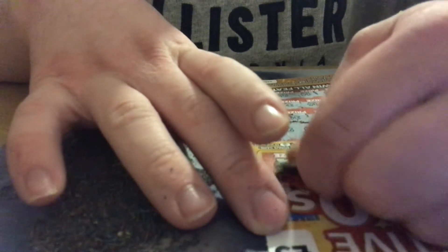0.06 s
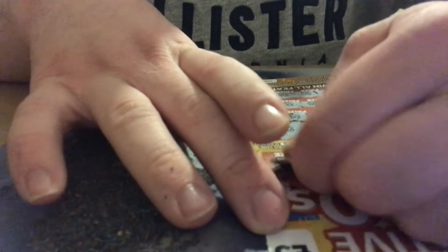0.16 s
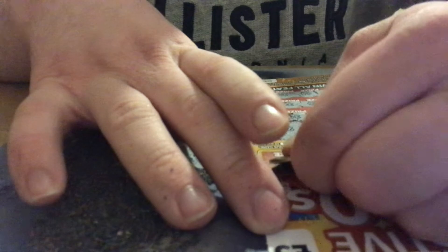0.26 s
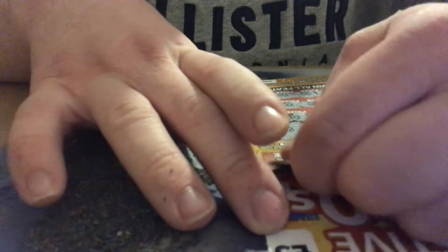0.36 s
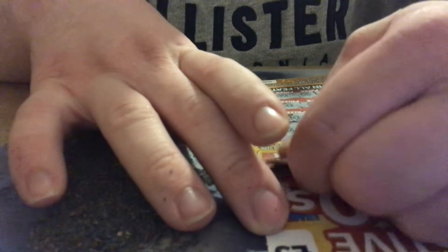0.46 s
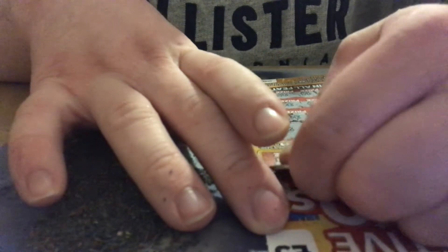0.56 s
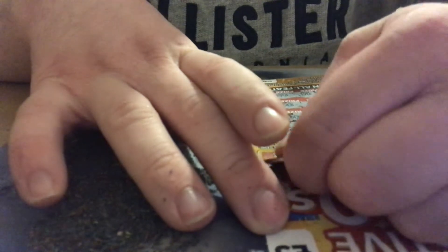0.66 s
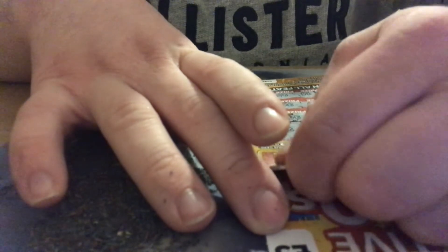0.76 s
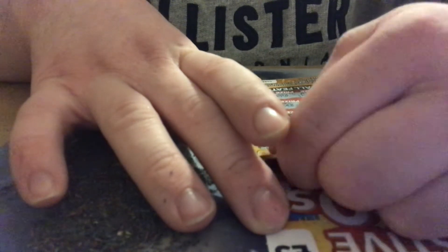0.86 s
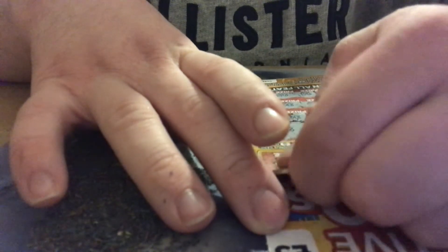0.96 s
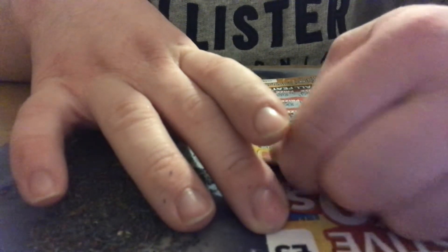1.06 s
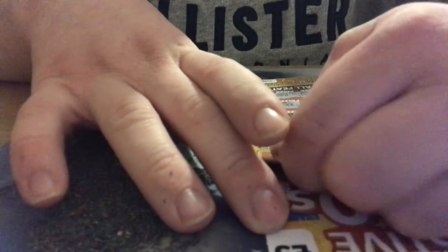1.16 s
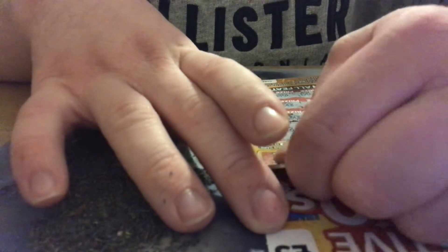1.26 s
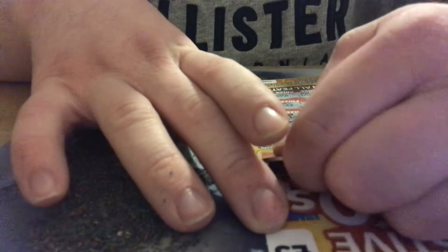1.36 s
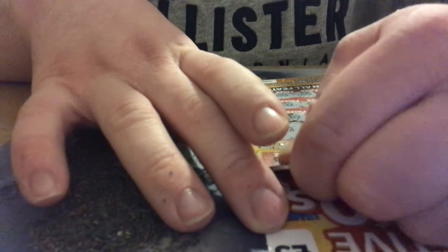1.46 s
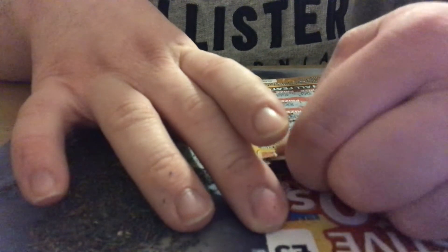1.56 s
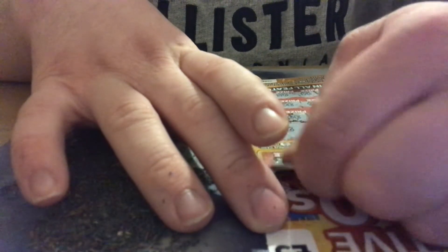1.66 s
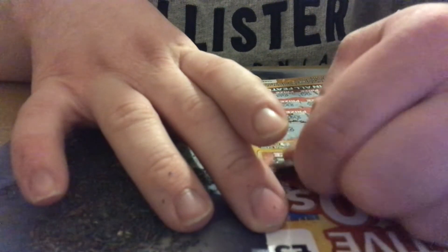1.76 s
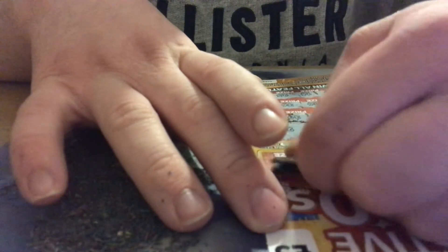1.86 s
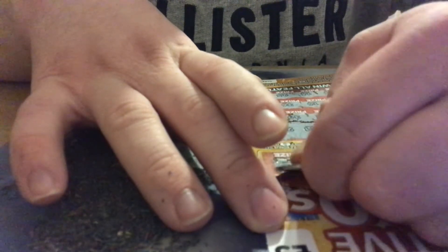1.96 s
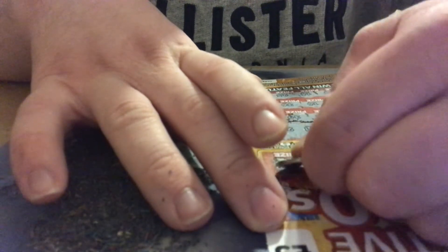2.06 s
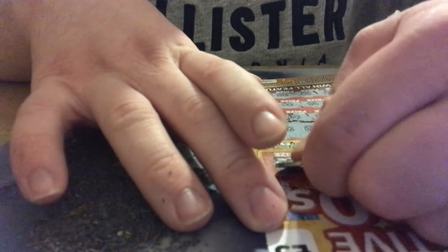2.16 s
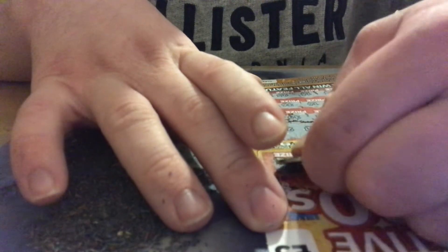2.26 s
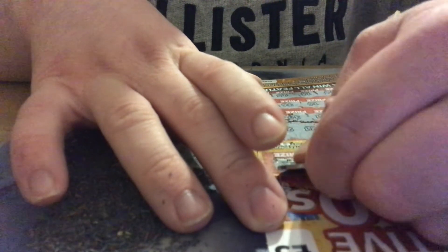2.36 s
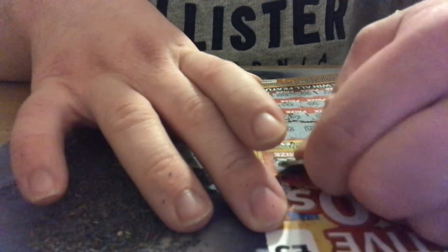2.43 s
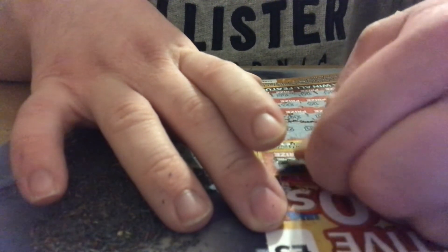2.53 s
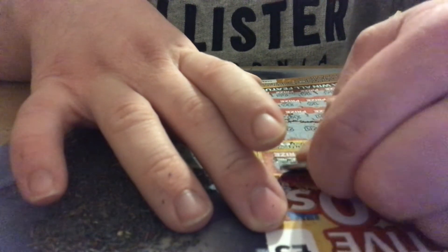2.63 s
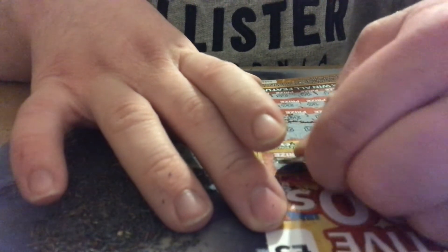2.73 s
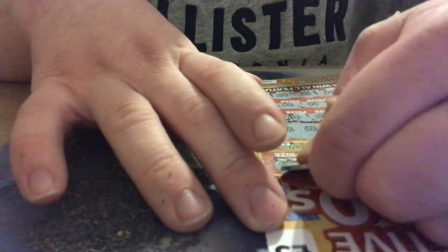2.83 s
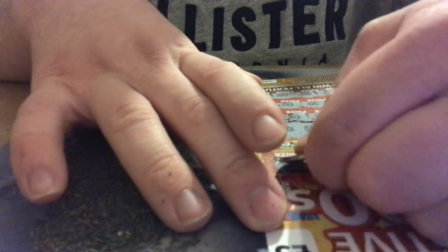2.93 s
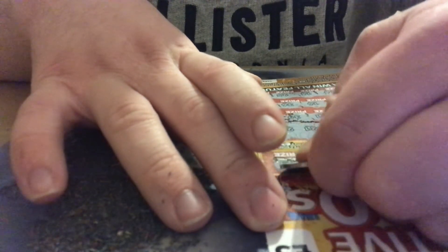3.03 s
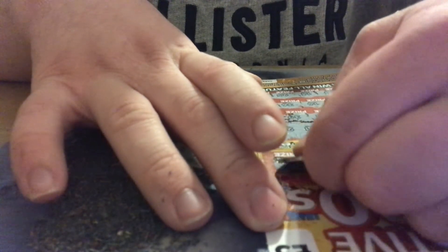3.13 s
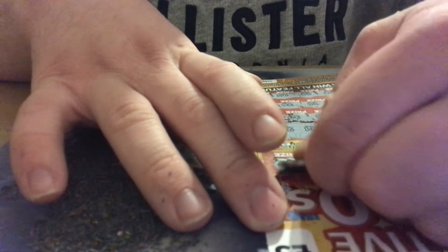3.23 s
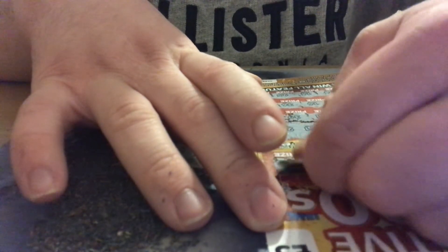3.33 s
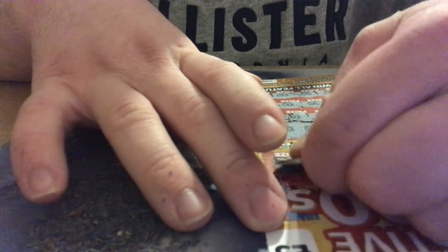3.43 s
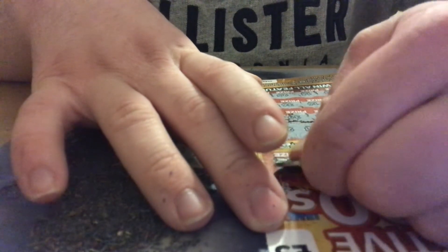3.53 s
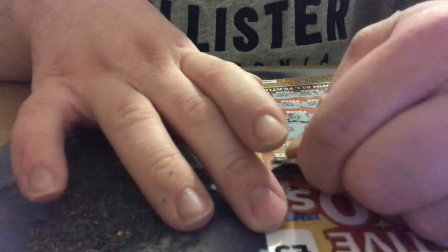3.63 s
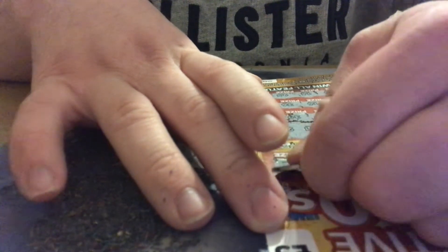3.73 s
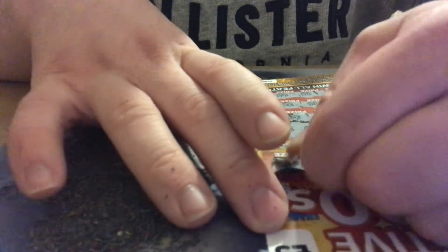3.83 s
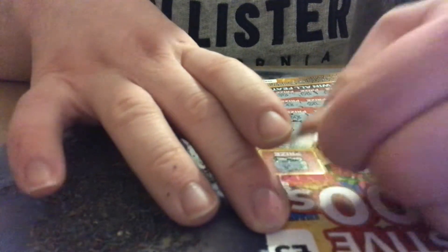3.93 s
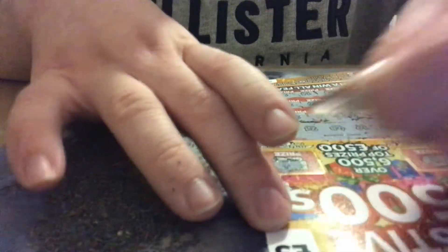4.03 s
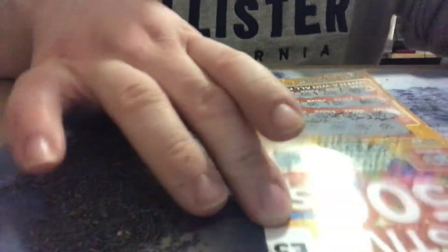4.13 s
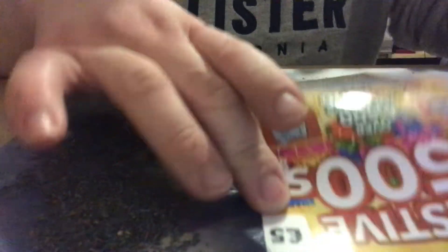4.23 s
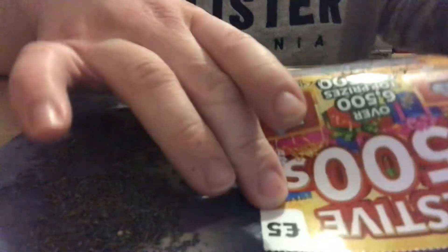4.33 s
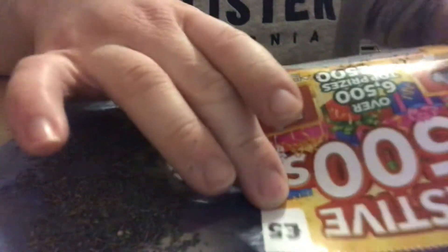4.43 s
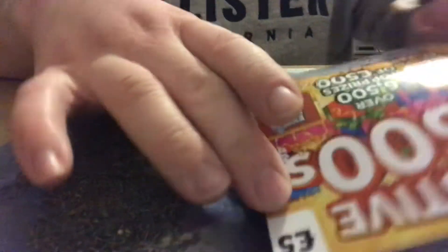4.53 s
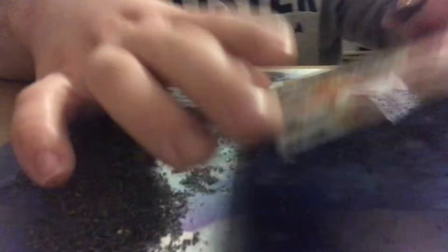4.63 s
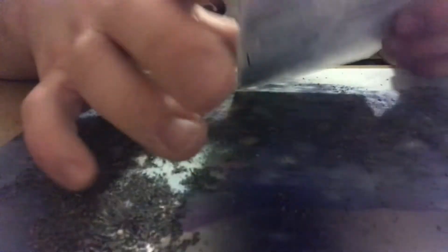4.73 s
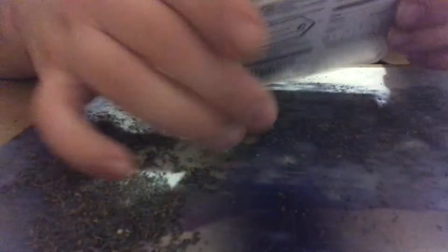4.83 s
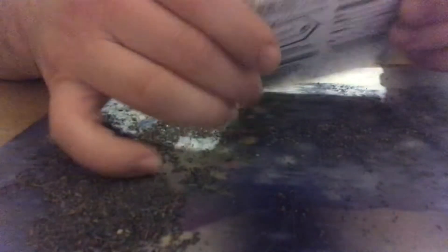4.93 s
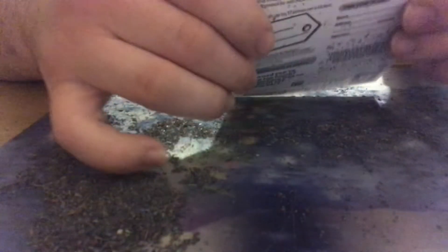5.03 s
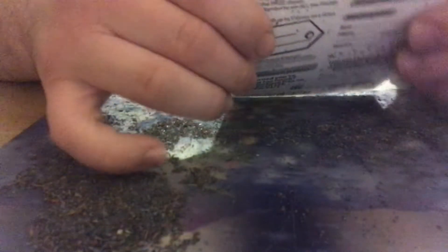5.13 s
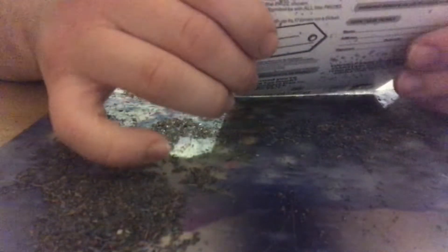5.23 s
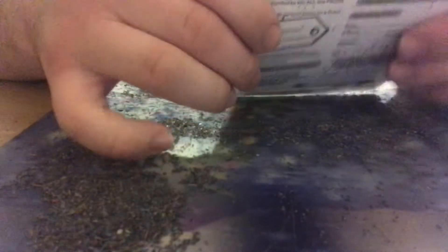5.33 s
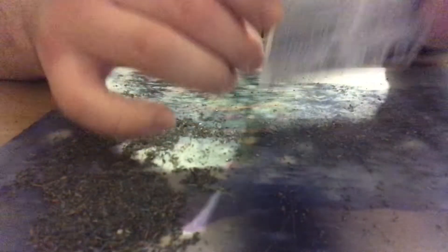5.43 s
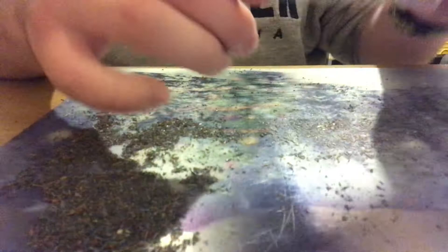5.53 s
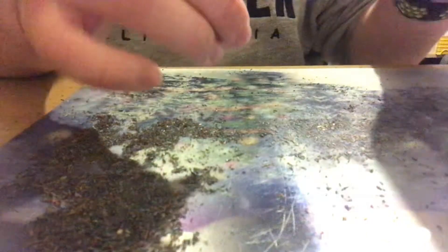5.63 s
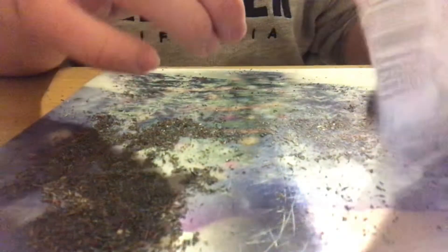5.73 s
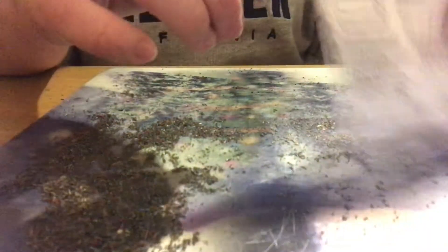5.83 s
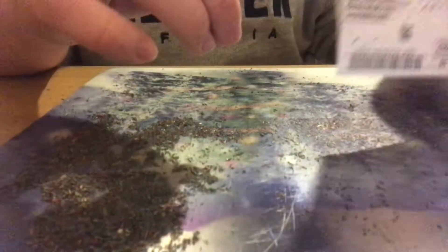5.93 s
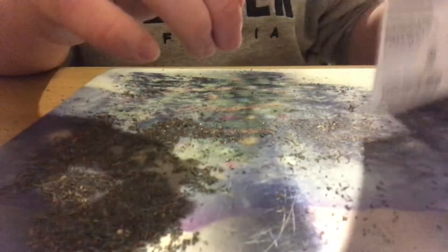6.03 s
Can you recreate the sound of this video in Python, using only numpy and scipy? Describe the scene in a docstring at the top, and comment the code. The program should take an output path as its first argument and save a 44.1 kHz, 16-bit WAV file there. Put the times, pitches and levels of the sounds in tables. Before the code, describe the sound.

Fast, uneven coin scratching on thin card over a wooden table, papery and mid-toned, with small clicks and muffled thumps as the coin catches. Later comes a quieter stretch of card swish, little flicks, a low bump and gritty brushing with tiny squeaks. It ends with a sudden loud rattling slap and skid of card on table, then one blunt knock. Close microphone, small dry room, slight hiss and hum.

```python
"""A coin rasps the coating off a scratchcard in quick strokes, ticking as it touches down: friction is
a train of random grains under pressure that follows the speed, filtered by the resonances of the card.
Flakes snap as short noise bursts. Then the card slides off its mat and flicks, bumps, sweeps crumbs
aside and squeaks by stick-slip. It clatters and skids on a wooden table, and a duller knock follows.
A diffuse echo gives a small room; behind all lie hiss and a low hum."""
import sys
import numpy as np
from scipy import signal
from scipy.fft import rfft, irfft
from scipy.io import wavfile
from scipy.ndimage import map_coordinates

SR = 44100
rng = np.random.default_rng(int(sys.argv[2]) if len(sys.argv) > 2 else 0)


def wav_record(signal):
    """Record a signal, one row per channel, as 16-bit PCM in the file named by sys.argv[1]."""
    frames = np.transpose(np.atleast_2d(signal))
    bounded = np.clip(frames, -1, 1)
    # unit amplitude maps onto the largest positive 16-bit level
    quanta = np.round(bounded * 32767).astype(np.int16)
    wavfile.write(sys.argv[1], SR, quanta)


N = 268348
TIME = np.arange(N) / SR   # s

# coin strokes, push and pull in turn: start_s, length_s, rasp_level_db
STROKES = [(0, 0.022, -59), (0.021, 0.062, -48), (0.131, 0.034, -42), (0.254, 0.022, -57.5),
           (0.363, .048, -41.5), (0.455, 0.049, -42), (0.564, 0.053, -40.5), (0.692, 0.038, -46.5),
           (.782, 0.057, -41.5), (0.885, 0.065, -41.5), (0.997, .09, -39), (1.145, 0.047, -39.5),
           (1.284, 0.037, -39.5), (1.408, 0.034, -48.5), (1.503, 0.042, -42.5), (1.618, 0.057, -52.5),
           (1.749, .05, -42), (1.855, 0.059, -48), (1.96, 0.061, -49), (2.163, 0.007, -62.5),
           (2.216, 0.016, -39), (2.305, .029, -41.5), (2.402, 0.055, -42), (2.53, 0.039, -44.5),
           (2.632, 0.051, -40.5), (2.76, 0.036, -48.5), (2.853, 0.044, -42.5), (2.983, 0.029, -54.5),
           (3.08, 0.032, -50), (3.214, 0.036, -55), (3.313, 0.033, -44.5), (3.424, 0.021, -52),
           (3.548, 0.02, -51), (3.647, 0.039, -41), (3.742, 0.012, -73)]
# push, then pull: rumble_db in a usual stroke, hiss_db relative to the rasp
DIRECTIONS = [(-42, -9), (-47, -7)]
# exponents of speed for the amplitude of rumble, rasp and hiss (no unit)
SPEED_EXPONENTS = [0.34, 1, 1.66]
# the coin catches and shudders on the table: start_s, level_db
CATCHES = [(0, -42.5), (.148, -28.5), (0.38, -39), (1.537, -34.5), (1.78, -30), (1.993, -36.5),
           (2.213, -33.5), (2.671, -43.5), (2.888, -39), (3.114, -38.5), (3.321, -38), (3.559, -44)]
# the coin touches down hard: time_s, level_db
COIN_TICKS = [(.1098, -52), (.151, -41.5), (.3442, -45), (.456, -54.5), (.5418, -50), (.7772, -48.5),
              (1.2561, -50), (1.3993, -52.5), (1.4786, -50.5), (1.7025, -54), (1.966, -51.5), (2.164, -58),
              (2.218, -38), (2.308, -49), (2.403, -50.5), (2.542, -50.5), (2.5966, -57.5), (3.049, -59.5),
              (3.286, -52.5), (3.51, -56.5)]
# the card is drawn off the mat and lifted: time_s, swish_db, hand_rumble_db
DRAG = [(3.7, -101.5, -62), (3.96, -79, -66), (3.99, -61.5, -51), (4.03, -79, -62), (4.09, -70, -58),
        (4.16, -57.5, -52.5), (4.205, -50, -51.5), (4.27, -56, -54.5), (4.31, -64, -54), (4.37, -65.5, -61),
        (4.41, -78, -88), (4.45, -55.5, -70), (4.56, -64.5, -60), (4.68, -72.5, -59.5), (4.77, -58, -35),
        (4.9, -78, -68)]
# the bending card flicks: time_s, level_db
FLICKS = [(3.832, -67.5), (3.975, -56), (4.1451, -49), (4.4758, -49), (4.596, -55.5)]
# hand and card bump the table: time_s, level_db
BUMPS = [(4.596, -47.5), (4.6975, -39.5), (4.7495, -32), (4.837, -40.5)]
# the sweeping edge snags: time_s, level_db
SNAGS = [(5.0945, -55), (5.161, -52), (5.3232, -47.5), (5.348, -47.5)]
# the card's edge sweeps crumbs of coating aside: time_s, level_db
SWEEP = [(4.82, -71), (4.876, -62.5), (4.954, -65.5), (5.014, -58.5), (5.026, -69), (5.082, -75),
         (5.096, -46.5), (5.116, -49), (5.176, -65), (5.306, -66.5), (5.324, -58), (5.34, -61.5),
         (5.35, -46.5), (5.366, -70), (5.42, -91)]
# the edge squeaks: start_s, length_s, first_pitch_hz, last_pitch_hz, level_db
SQUEAKS = [(5.083, 0.095, 3850, 4060, -53.5), (5.319, 0.041, 1450, 1160, -45),
           (5.347, 0.041, 900, 774, -51)]
# the card strikes the table: time_s, level_db, hardness_db (taken from the thud, added to the snap)
CLATTER = [(5.7176, -33.5, 5.5), (5.7198, -29.5, -10), (5.7245, -42.5, 14), (5.7445, -25.5, 1.5),
           (5.749, -25.5, 0.5), (5.7635, -51.5, 14), (5.8147, -48, 12), (5.819, -39.5, 8.5),
           (5.8335, -38, 3)]
# its edge skids between the blows: start_s, length_s, level_db
SKIDS = [(5.723, 0.015, -21), (5.732, 0.037, -26), (5.744, 0.097, -42.5), (5.822, 0.032, -37)]

# smooth response of each sounding body: frequency_hz, gain_db
# resonances on top of it (..._MODES): centre_hz, width_hz, peak_db
# the card under the coin
SCRATCHED = [(30, -25), (60, 0), (100, 4.5), (170, -11), (330, -4.5), (600, -6), (950, -12.5), (1300, -7.5),
             (1560, -22), (2200, -22.5), (4500, -31.5), (8000, -44), (10500, -48.5), (15000, -49)]
SCRATCHED_MODES = [(91.4, 16.3, 3.46), (129.4, 34, 12.6), (204.4, 17, 6.9), (226, 66, 11.2), (324, 91, 8.4),
                   (362.5, 30, 7.1), (526.5, 84, 7.4), (804, 200, 10.8), (1076.3, 129, 16.3),
                   (1148.4, 150, 12.66), (1410, 87, 15.4), (1713, 163, 24.4), (1993, 230, 13.4),
                   (2340, 360, 11.6), (3406, 180, 12.5), (5580, 98, 7.5), (14200, 1000, 4.3)]
# a snapping flake: frequency_hz, gain_db
FLAKE = [(30, -21), (1200, -8), (3000, -20), (6500, 1), (10500, -1), (13500, -3), (16000, -5)]
# the sliding card
CARD = [(30, -32), (70, 8), (120, 7), (175, 0.5), (280, 4), (500, -11), (900, -8), (1500, 1), (2800, -14),
        (6300, -20.5), (9500, -31.5), (15500, -34)]
CARD_MODES = [(1080, 180, 6.9), (1480, 140, 1.4), (1930, 140, 1.9), (2570, 1400, 3.6), (3180, 200, 3.4),
              (4350, 150, 1.7), (6100, 600, 2)]
# the edge of the card
EDGE = [(30, -16), (100, -9), (250, -11), (600, -9.5), (1200, 1), (2700, -7), (4800, -12), (6500, -13.5),
        (10000, -21), (15500, -21.5)]
EDGE_MODES = [(350, 55, 3.1), (1180, 160, 6), (1570, 180, 4.5), (1990, 180, 8.5), (4340, 200, 2.5)]
# the table struck by the card
TABLE = [(30, -14.5), (90, 2.5), (170, -7), (300, -3), (680, -10), (1000, -6.5), (1350, -13.5), (1950, -14),
         (2700, -11), (4800, -9.5), (7000, -10.5), (10500, -19.5), (15500, -22.5)]
TABLE_MODES = [(91.6, 23, 5.4), (358, 34, 10.2), (557, 94, 7.3), (784, 52, 7.9), (1160, 210, 9.1),
               (1470, 220, 11.6), (2480, 100, 4.7), (3100, 280, 4.3)]
# the table under the duller knock
KNOCKED = [(30, -8), (90, 22.5), (200, 4), (400, 4), (650, 1), (950, 1.5), (1300, -6.5), (2000, -24.5),
           (3100, -28.5), (4500, -37.5), (6500, -41.5), (10000, -46), (15500, -48.5)]
KNOCKED_MODES = [(247, 66, 13), (369, 9.2, 21), (486, 67, 12.5), (788, 31, 10), (970, 55, 6.2)]
# the room's echo: frequency_hz, level_db, t60_s
ROOM = [(81, -6, 0.53), (323, -5.5, 0.09), (950, -13.5, 0.3), (1670, -13, 0.22), (6030, -20.5, 0.32),
        (14000, -15, 0.09)]
# spectral shape of still air and microphone hiss: frequency_hz, density_db
AIR = [(15, -39.5), (25, -14.5), (70, 7.5), (180, -11), (344, -3), (489, -11), (936, -17.5), (1130, -16),
       (2110, -25), (3430, -23.5), (4870, -28), (6740, -27), (10400, -35), (14000, -29.5), (16000, -37)]
# a low hum: pitch_hz, level_db
HUM = [(50, -65.5), (99, -82)]

# how each kind of contact drives a body: low_db, middle_db, high_db
TICK_COLOUR, CATCH_COLOUR = (-0.5, -1.6, -8.5), (0, -12, -55)
FLICK_COLOUR, BUMP_COLOUR = (-1.2, -4.5, -1.2), (0, -24, -26)
SWEEP_COLOUR, SNAG_COLOUR = (-1.4, -0.92, -1.2), (-30, 0, -7)
CLATTER_COLOUR, SKID_COLOUR = (-5, 0, -6.5), (-1.5, 0, -7)
KNOCK_COLOUR, KNOCK_RUB_COLOUR = (-5, 0, -16), (-1.5, 0, -24)

RUMBLE_TOP_HZ, RASP_TOP_HZ = 727, 2800   # borders of the low, middle and high ranges
BLOW_S = 0.01   # a blow's level is its rms over this time
ATTACK_S, RELEASE_S = 0.014, 0.016   # the coin bites and lets go
STROKE_PEAK, ARCH_DB = 0.74, 9   # share of a stroke before full speed; sag per stroke length either side
USUAL_DB, RUMBLE_FOLLOWS = -43.5, 0.16   # usual rasp; share of a stroke's extra dB that reaches the table
WEAR_DB_PER_S = 1.5   # the hiss dulls as the coating wears away
RUB_DB, RUB_SPREAD_S = -19, 0.086   # the hand's rub relative to each stroke; reach either side of its middle
TURN_LEAD_S, TURN_DB = 0.018, -68.5   # light touch-down before each stroke but the first: mean lead and level
CATCH_S, CATCH_PEAK = 0.021, 0.09   # length of a shudder, share of it before its height
IDLE_SNAPS_PER_S, COIN_SNAPS_PER_S, CARD_SNAPS_PER_S = 2.6, 72, 16   # the coin's rate is at full speed
SNAP_DB, PILE_DB, PILE_S = -92, 15, 0.93   # first level; growth over this time as crumbs pile up
DRAG_RASP_DB = -2.5   # middle range relative to the swish
SQUEAK_PEAK, SKID_PEAK = 0.27, 0.29   # share of the length before the height
KNOCK_S, KNOCK_DB = 6.0485, -25.5
REBOUND_S, REBOUND_LOSS_DB = 0.0055, 2.5   # spacing and loss of each rebound
KNOCK_RUB_S, KNOCK_RUB_DB = 0.034, -29   # the blunt contact rubs as it lands
AIR_DB, HUM_WAVER_DB = -64.5, 2.5
CUTOFF_HZ = 16100


def scratching(table_lag_s=0.0042, turn_jitter_s=0.0036, turn_spread_db=3):
    """Friction and impact: the coin scrapes, ticks and catches, exciting the card and the table under it."""
    pressures = movements(coin_moves())
    pressures[0] = np.interp(TIME - table_lag_s, TIME, pressures[0])   # the heavy table follows late
    scrape = friction(pressures, per_s=5000, spread_db=3.0, judder_db=2.5, judder_hz=162)
    hand_rub = sum(from_db(db + RUB_DB) * swell(start_s + length_s / 2, RUB_SPREAD_S, RUB_SPREAD_S)
                   for start_s, length_s, db in STROKES)
    scrape[0] += hand_rub * grains(per_s=2500, spread_db=1.5)
    light_ticks = [(start_s - TURN_LEAD_S + turn_jitter_s * rng.normal(),
                    TURN_DB + turn_spread_db * rng.normal()) for start_s, _, _ in STROKES[1:]]
    ticks = blows(list(COIN_TICKS) + light_ticks, TICK_COLOUR, crunch_s=0.0011)
    return flex(body(scrape + ticks, SCRATCHED, SCRATCHED_MODES), depth=0.0414, rate_hz=12.8)


def coin_moves():
    """Asymmetric friction: pushes shake the table more, pulls are lighter and brighter; catches add shudders."""
    for k, (start_s, length_s, rasp_db) in enumerate(STROKES):
        rumble_db, hiss_db = DIRECTIONS[k % 2]
        rumble_db = rumble_db + RUMBLE_FOLLOWS * (rasp_db - USUAL_DB)
        hiss_db = rasp_db + hiss_db - WEAR_DB_PER_S * start_s
        yield stroke_speed(start_s, length_s), (rumble_db, rasp_db, hiss_db)
    for start_s, db in CATCHES:
        yield gesture(start_s, CATCH_S, CATCH_PEAK), db + np.array(CATCH_COLOUR)


def stroke_speed(start_s, length_s):
    """Kinematics of a stroke: attack, an arch of speed that peaks late, release."""
    speed = np.zeros(N)
    span = slice(*np.searchsorted(TIME, [start_s - ATTACK_S, start_s + length_s + RELEASE_S]))
    age = TIME[span] - start_s
    attack = np.clip(0.5 + age / ATTACK_S, 0, 1)
    release = np.clip(0.5 + (length_s - age) / RELEASE_S, 0, 1)
    speed[span] = attack * release * from_db(-ARCH_DB * np.abs(age / length_s - STROKE_PEAK))
    return speed


def flex(x, depth, rate_hz):
    """Frequency modulation: the card bends under the hand, and a wandering time shift wavers the pitch."""
    lead = depth * drift(rate_hz) * SR / (2 * np.pi * rate_hz)   # samples; depth is a rough share of pitch
    return map_coordinates(x, [np.arange(N) + lead], order=3)


def flakes(spread_db=4.0):
    """Random fracture: coating snaps crisply, more often while the coin or the card moves."""
    coin_speed = sum(stroke_speed(start_s, length_s) for start_s, length_s, _ in STROKES)
    card_moving = (TIME > DRAG[0][0]) & (TIME < SWEEP[-1][0])
    snaps_per_s = IDLE_SNAPS_PER_S + COIN_SNAPS_PER_S * coin_speed + CARD_SNAPS_PER_S * card_moving
    born = rng.random(N) < snaps_per_s / SR
    level_db = SNAP_DB + PILE_DB * np.minimum(TIME / PILE_S, 1)
    sizes = from_db(level_db + spread_db * np.minimum(rng.exponential(1, N), 3))
    # each snap's energy decays over about half a millisecond
    energy = signal.lfilter([0.04], [1, -0.96], born * sizes ** 2 * BLOW_S * SR + 1e-18)
    return through(np.sqrt(energy) * rng.standard_normal(N), response(FLAKE)[1])


def handling():
    """Sliding friction and impact: the loose card swishes over the mat, flicks, bumps and snags."""
    swish, rumble = follow(DRAG)
    pressures = [rumble, from_db(DRAG_RASP_DB) * swish, swish]
    drag = friction(pressures, per_s=14000, spread_db=1.5, judder_db=3.0, judder_hz=90)
    flicks = blows(FLICKS, FLICK_COLOUR, crunch_s=0.0022)
    bumps = blows(BUMPS, BUMP_COLOUR, crunch_s=0.0072)
    snags = blows(SNAGS, SNAG_COLOUR, crunch_s=0.011)
    return body(drag + flicks + bumps + snags, CARD, CARD_MODES)


def sweeping():
    """Granular friction: the card's edge brushes loose crumbs aside."""
    pressures = from_db(SWEEP_COLOUR)[:, None] * follow(SWEEP)
    brush = friction(pressures, per_s=5800, spread_db=2.0, judder_db=2.15, judder_hz=111)
    return body(brush, EDGE, EDGE_MODES)


def squeaks(waver_hz=55, flutter_db=3):
    """Stick-slip oscillation: the edge sounds a tone of wavering, gliding pitch."""
    out = np.zeros(N)
    for start_s, length_s, first_hz, last_hz, db in SQUEAKS:
        glide_hz = np.interp(TIME, [start_s, start_s + length_s], [first_hz, last_hz])
        pitch_hz = glide_hz + waver_hz * drift(121)
        tone = np.sin(2 * np.pi * np.cumsum(pitch_hz) / SR) * from_db(flutter_db * drift(150))
        out += from_db(db) * gesture(start_s, length_s, SQUEAK_PEAK) * rms_one(tone)
    return out


def clatter():
    """Repeated impact: the card's stiff edge strikes, skids and bounces, exciting the table's modes."""
    pressures = movements((gesture(start_s, length_s, SKID_PEAK), db + np.array(SKID_COLOUR))
                          for start_s, length_s, db in SKIDS)
    skid = friction(pressures, per_s=13000, spread_db=5.0, judder_db=2.0, judder_hz=200)
    strikes = blows(CLATTER, CLATTER_COLOUR, crunch_s=0.0015)
    return body(skid + strikes, TABLE, TABLE_MODES)


def knock(count=3):
    """Inelastic rebound: a blunt blow returns twice, weaker each time, with a rub as it lands."""
    hits = [(KNOCK_S + k * REBOUND_S, KNOCK_DB - k * REBOUND_LOSS_DB) for k in range(count)]
    landing = gesture(KNOCK_S, KNOCK_RUB_S, peak=0.3)
    pressures = movements([(landing, KNOCK_RUB_DB + np.array(KNOCK_RUB_COLOUR))])
    rub = friction(pressures, per_s=5200, spread_db=2.5, judder_db=1.0, judder_hz=200)
    return body(rub + blows(hits, KNOCK_COLOUR, crunch_s=0.016), KNOCKED, KNOCKED_MODES)


def room(x, wet_db, count=10):
    """Reverberation: a diffuse echo builds up and decays exponentially, at its own rate in each band."""
    edges_hz, age = np.geomspace(40, 17000, count + 1), TIME[:SR // 2]
    build_up, echo = 1 - np.exp(-(age / 0.015) ** 2), 0
    for low, high in zip(edges_hz, edges_hz[1:]):
        centre_hz = np.sqrt(low * high)
        band = signal.butter(2, [low, high], "band", fs=SR, output="sos")
        noise = signal.sosfilt(band, rng.standard_normal(len(age)))
        decay = np.exp(-np.log(1000) * age / at_hz(ROOM, centre_hz, axis=2))
        tail = rms_one(noise * build_up * decay)
        # energy in proportion to bandwidth
        echo = echo + from_db(at_hz(ROOM, centre_hz)) * tail * np.sqrt(2 * (high - low) / SR / len(age))
    return x + from_db(wet_db) * signal.fftconvolve(x, echo)[:N]


def background():
    """Stationary noise: white noise shaped to air and hiss, with low hum tones whose level wavers slowly."""
    _, gain = response(AIR)
    air = from_db(AIR_DB) * through(rng.standard_normal(N), gain)
    hum = sum(from_db(db) * np.sqrt(2) * np.sin(2 * np.pi * (pitch_hz * TIME + rng.random()))
              for pitch_hz, db in HUM)
    return air + hum * from_db(HUM_WAVER_DB * drift(0.45))


def friction(pressures, per_s, spread_db, judder_db, judder_hz):
    """Dry friction: grains under low, middle and high pressure, juddering together as the edge catches."""
    judder = rms_one(from_db(judder_db * drift(judder_hz)))
    return judder * np.array([pressure * grains(per_s, spread_db) for pressure in pressures])


def grains(per_s, spread_db):
    """Shot noise: tiny slips and breaking flakes of uneven size and random sign, at rms 1."""
    sizes = from_db(spread_db * np.minimum(rng.exponential(1, N), 5))
    return rms_one(sizes * rng.choice([-1, 1], N) * (rng.random(N) < per_s / SR))


def blows(hits, colour_db, crunch_s, size=1024):
    """Impulsive contact: low and middle impulses with a short decaying crunch in the high range."""
    forces, age = np.zeros((3, N + size)), np.arange(size) / SR
    for time_s, db, *hardness in hits:
        levels_db = db + np.array(colour_db) + sum(hardness) * np.array([-1, 0, 1])
        thud, ring, snap = from_db(levels_db)
        at = int(np.clip(time_s * SR, 0, N))
        crunch = rms_one(rng.standard_normal(size) * np.exp(-age / crunch_s)) / np.sqrt(size)   # energy 1
        forces[:2, at] += thud, ring
        forces[2, at:at + size] += snap * crunch
    return forces[:, :N] * np.sqrt(BLOW_S * SR)


def movements(moves):
    """Power laws of speed: low, middle and high pressures of (speed, three levels in dB), summed as power."""
    power = np.zeros((3, N))
    for speed, levels_db in moves:
        moving = speed > 0
        pressure = from_db(levels_db)[:, None] * speed[moving] ** np.array(SPEED_EXPONENTS)[:, None]
        power[:, moving] += pressure ** 2
    return np.sqrt(power)


def gesture(start_s, length_s, peak):
    """Kinematics of a movement that is fastest after this share of its length."""
    return swell(start_s + peak * length_s, peak * length_s, (1 - peak) * length_s)


def swell(peak_s, rise_s, fall_s):
    """Kinematics of one movement: a squared-sine speed gathers, peaks and stops."""
    corners, speed = [peak_s - rise_s, peak_s, peak_s + fall_s], np.zeros(N)
    span = slice(*np.searchsorted(TIME, corners[::2]))
    speed[span] = np.sin(np.pi / 2 * np.interp(TIME[span], corners, [0, 1, 0])) ** 2
    return speed


def follow(curve):
    """Envelope interpolation in decibels: gain over time for each dB column, silent outside the curve."""
    time_s, *columns = np.transpose(curve)
    return [from_db(np.interp(TIME, time_s, db, left=-np.inf, right=-np.inf)) for db in columns]


def body(forces, spectrum, modes, order=10):
    """Modal resonance: three forces drive the low, middle and high range of a body."""
    hz, gain = response(spectrum, modes)
    low = 1 / (1 + (hz / RUMBLE_TOP_HZ) ** order)
    not_high = 1 / (1 + (hz / RASP_TOP_HZ) ** order)
    shares = low, (1 - low) * not_high, 1 - not_high
    return sum(through(force, gain * np.sqrt(share)) for force, share in zip(forces, shares))


def response(spectrum, modes=(), order=8192):
    """Frequency response: frequencies in Hz and gain of a smooth slope with resonant peaks."""
    hz = np.arange(order // 2 + 1) * SR / order
    peaks_db = sum(db / (1 + (2 * (hz - centre) / width) ** 2) for centre, width, db in modes)
    return hz, from_db(at_hz(spectrum, hz) + peaks_db)


def through(x, gain):
    """Minimum-phase filtering: a causal filter of this gain shape, scaled so white noise keeps its level."""
    cepstrum = irfft(np.log(rms_one(gain) + 1e-6))
    half = len(cepstrum) // 2
    cepstrum[1:half] *= 2   # fold the cepstrum onto positive time
    cepstrum[half + 1:] = 0
    impulse = irfft(np.exp(rfft(cepstrum)))[:half]
    return signal.fftconvolve(x, impulse)[:N]


def drift(rate_hz):
    """Low-passed noise: smooth random change of rms 1, up to about rate_hz."""
    lowpass = signal.butter(2, rate_hz, fs=SR, output="sos")
    return rms_one(signal.sosfilt(lowpass, rng.standard_normal(N + SR))[SR:])


def at_hz(points, hz, axis=1):
    """Interpolation along log frequency: reads one column of a table."""
    table = np.array(points)
    return np.interp(np.log(hz + 1e-3), np.log(table[:, 0]), table[:, axis])


def from_db(db):
    """Logarithmic level: decibels to amplitude gain."""
    return 10 ** (np.asarray(db) / 20)


def rms_one(x):
    """Normalisation: scales to unit rms."""
    return x / np.sqrt(np.mean(x ** 2) + 1e-20)


def scene():
    """Superposition: rubbing and striking sound into the room, over the background."""
    rubbed = room(scratching() + flakes() + handling() + sweeping() + squeaks(), wet_db=-4.0)
    struck = room(clatter() + knock(), wet_db=-3.5)
    return (rubbed + struck + background())[None]


def record(dry):
    """Saturation and band limiting: the loudest peaks are rounded and the top is cut."""
    lowpass = signal.ellip(10, 0.2, 80, CUTOFF_HZ, fs=SR, output="sos")
    return signal.sosfilt(lowpass, np.tanh(dry))


dry = scene()
out = record(dry)
wav_record(out)
```